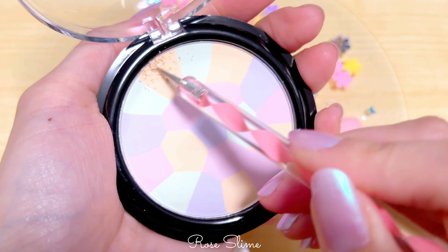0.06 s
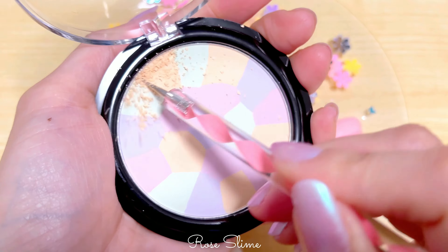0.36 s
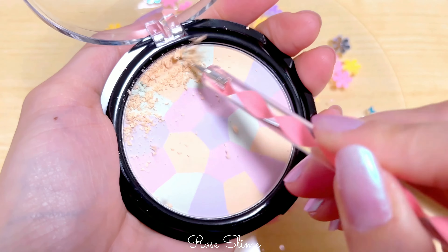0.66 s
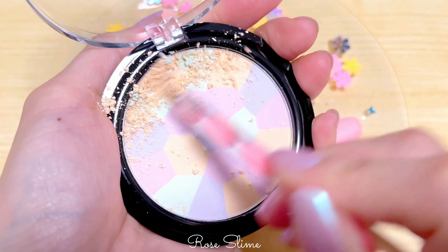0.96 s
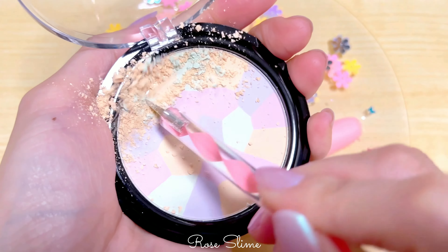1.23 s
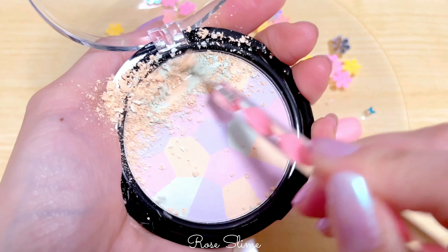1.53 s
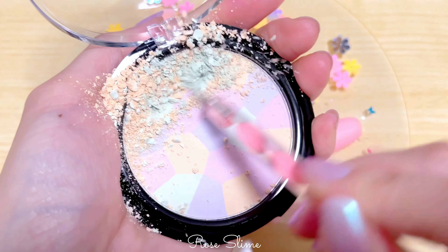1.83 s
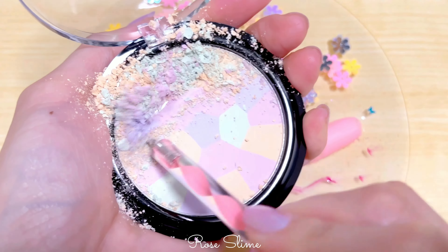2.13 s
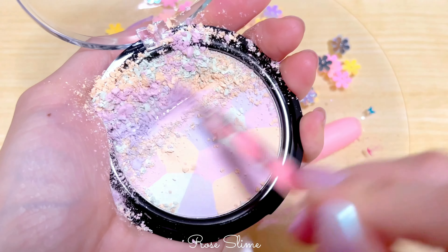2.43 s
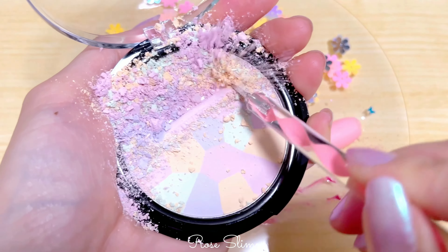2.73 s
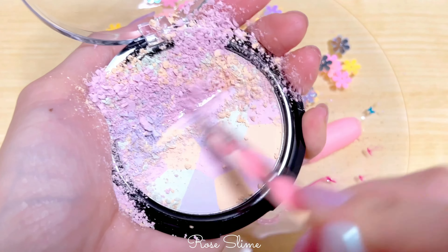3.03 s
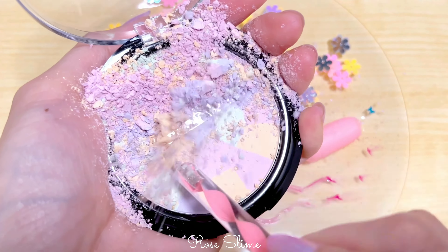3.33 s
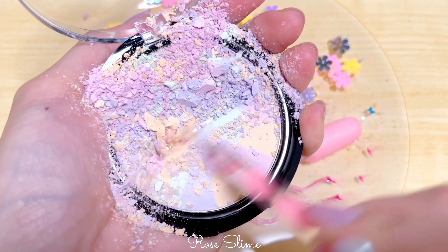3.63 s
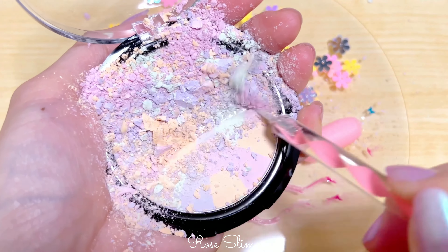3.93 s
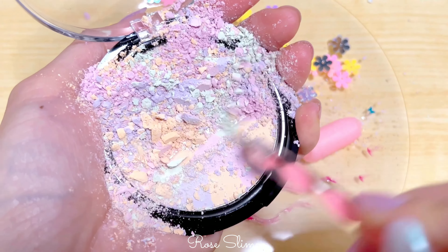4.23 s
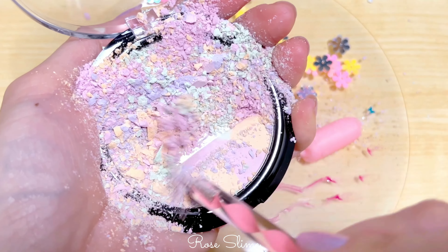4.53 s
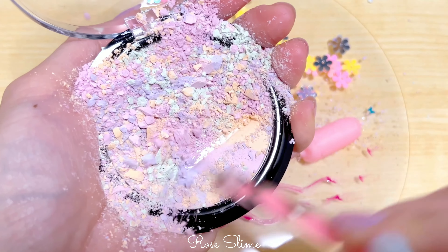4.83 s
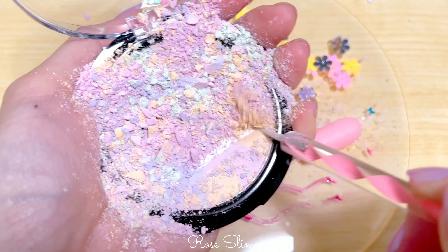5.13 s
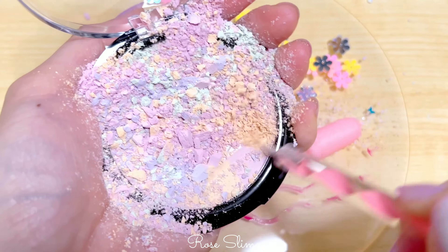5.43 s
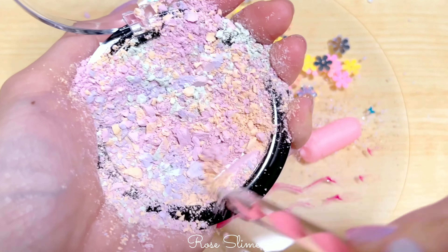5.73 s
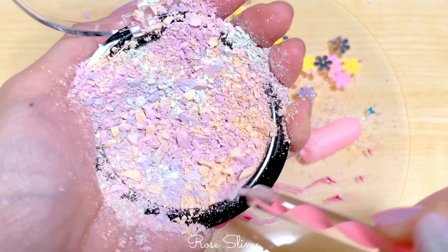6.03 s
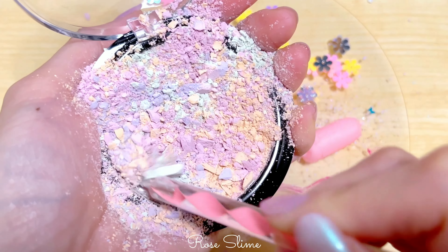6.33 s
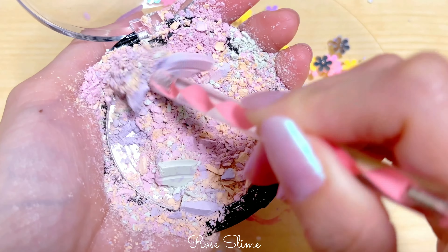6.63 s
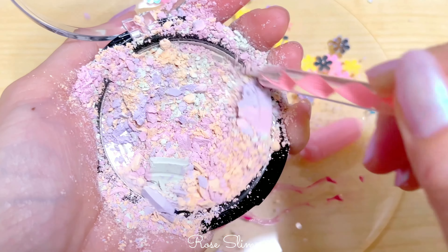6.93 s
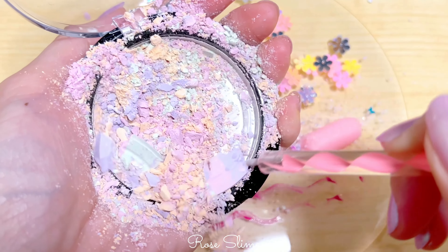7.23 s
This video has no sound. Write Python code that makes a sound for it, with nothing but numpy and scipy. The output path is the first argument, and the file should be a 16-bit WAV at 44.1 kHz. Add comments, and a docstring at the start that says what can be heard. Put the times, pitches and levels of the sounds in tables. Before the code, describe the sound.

Close to the microphone in a small quiet room, faint ticks grow into fast, even scratching as a metal point scrapes a compact of pressed powder. The scraping turns dense and crunchy, with gritty hiss, tiny cracks and a slight low shudder from the plastic case. After a short dip and one more burst, the tip slides around the rim with a softer, lightly ringing crumbly scrape that dies away.

```python
"""A small quiet room, microphone close to a hand-held plastic compact of pressed powder.
A pointed metal tool scratches the cake, about eight strokes a second: faint at first, then the tool rings.
From two seconds in it digs deeper, crunching, snapping flakes off and shaking the compact.
It eases just after five seconds and bites again briefly. From six seconds the tip sweeps once round
the rim through the loose crumbs, fading into the room's faint rumble and hiss."""
import sys
import numpy as np
from scipy import signal
from scipy.fft import rfft, irfft
from scipy.io import wavfile
from scipy.ndimage import uniform_filter1d

SR = 44100
rng = np.random.default_rng(int(sys.argv[2]) if len(sys.argv) > 2 else 0)


def unload_audio(sound):
    """Save the sound as a 16-bit wav file, at the path given as the first command line argument."""
    columns = np.transpose(np.atleast_2d(sound))
    # keep every value between -1 and 1, then stretch to whole-number steps
    steps = np.round(np.clip(columns, -1, 1) * 32767)
    wavfile.write(sys.argv[1], SR, steps.astype(np.int16))


N = 320204
TIME = np.arange(N) / SR

# Table levels are relative: each source adds its own trim.
# strokes of the tip: (start [s], length [s], level [dB], rocking of the compact [dB])
STROKES = [(0.23, 0.077, -83, -67), (.354, 0.068, -91, -70), (0.483, .042, -79, -62),
           (0.59, 0.058, -83, -57), (0.711, .048, -76.5, -64), (0.825, 0.022, -64.5, -70),
           (0.963, 0.0082, -39, -33), (1.033, 0.021, -42.5, -38.5), (1.183, 0.011, -48.5, -48),
           (1.25, 0.035, -37, -50), (1.369, 0.049, -39, -32), (1.476, 0.042, -37, -58),
           (1.594, 0.059, -37.5, -38), (1.708, 0.038, -30, -61), (1.819, .05, -32.5, -49.5),
           (1.94, 0.029, -34.5, -53), (2.06, 0.042, -31, -35), (2.167, 0.045, -34, -42),
           (2.296, 0.057, -35.5, -35), (2.395, .047, -34, -52.5), (2.52, 0.061, -37, -30),
           (2.634, 0.05, -33.5, -63.5), (2.756, 0.061, -37.5, -35.5), (2.875, 0.032, -32, -42.5),
           (2.998, 0.06, -38.5, -39.5), (3.11, 0.041, -34, -49.5), (3.25, 0.061, -34, -27.5),
           (3.36, 0.054, -35, -33.5), (3.474, 0.078, -33.5, -41.5), (3.604, 0.062, -32.5, -37),
           (3.726, 0.069, -34, -45.5), (3.851, 0.057, -34, -33), (3.974, .067, -34.5, -48.5),
           (4.095, 0.065, -38, -38), (4.218, 0.061, -36, -45), (4.326, 0.064, -34.5, -33.5),
           (4.454, 0.063, -34, -33.5), (4.569, .06, -34.5, -38.5), (4.702, 0.056, -35, -52.5),
           (4.821, .053, -33.5, -39), (4.944, 0.051, -34, -35), (5.059, 0.046, -33.5, -34.5),
           (5.172, 0.079, -38.5, -49), (5.299, 0.056, -35.5, -60), (5.418, 0.072, -40, -50),
           (5.571, 0.065, -36, -40.5), (5.65, 0.074, -39, -37.5), (5.78, 0.061, -33.5, -40.5),
           (5.899, 0.017, -47, -30)]
# how deep the tip digs into the cake: (time [s], bite [0-1])
BITE = [(.8, 0.58), (.96, 0.16), (1.18, 0.28), (1.25, 0.13), (1.37, 0.1), (1.6, 0.28), (1.7, 0.4),
        (1.94, 0.66), (2.06, .82), (2.8, .98), (3.5, 0.87), (4.2, 0.93), (4.33, 0.82), (5.06, 0.77),
        (5.17, .2), (5.3, 0.38), (5.42, 0.29), (5.58, 0.65), (5.9, 0.59)]
# the tool's ring changes with the grip: (time [s], ring [Hz], overtone [Hz], ring over stroke level [dB])
TOOL_RING = [(.82, 1700, 7800, 1), (.96, 2110, 7860, 10.5), (1.25, 1988, 8000, 17), (1.37, 1910, 8120, 2.5),
             (1.6, 1735, 8250, -1.5), (1.7, 1690, 8170, -11), (2.06, 1710, 8100, 4), (2.7, 1686, 7750, 2.5),
             (3.0, 1905, 7855, 9), (3.35, 1925, 7670, 9), (3.5, 1899, 7540, 7), (4.0, 1897, 7150, 6.5),
             (4.3, 2080, 7650, 9.5), (5.06, 2022, 7750, 11.5), (5.18, 2044, 7830, 2.5),
             (5.56, 1876, 7590, 4.5), (5.9, 1652, 7720, 0)]
# how strongly the plastic case answers: (time [s], level over the tool's ring [dB])
CASE_RESPONSE = [(.8, -5.5), (.96, -27.5), (1.25, -19), (1.37, -31), (1.94, -31), (2.06, -21.5), (2.35, -8),
                 (2.65, -13.5), (3.1, -18.5), (4.0, -14.5), (4.25, -32.5), (4.6, -38), (4.85, -27),
                 (5.42, -33.5), (5.64, -12)]
# the case's resonance sinks as the cake comes loose: (time [s], pitch [Hz])
CASE_PITCH = [(1.2, 1074), (3.2, 1096), (4.8, 1030), (5.6, 968.5)]
# large flakes breaking off: (time [s], knock [dB], snap [dB])
FLAKES = [(1.277, -10, -55), (2.0878, -12.5, -17), (2.2078, -14, -16), (2.331, -8, -21),
          (2.4046, -9, -19.5), (2.4335, -8.5, -21), (2.563, -7, -23.5), (2.6362, -20, -19.5),
          (2.8094, -6, -19.5), (3.0335, -8.5, -31), (3.1284, -11, -18.5), (3.1407, -0.5, -14),
          (3.2946, -9, -15.5), (3.3733, -5.5, -16.5), (3.3978, -3, -22), (3.497, -9.5, -17),
          (3.5198, 3, -25), (3.5235, -3, -14.5), (3.6072, -7.5, -19), (3.6252, -2.5, -19),
          (3.6459, -15, -34), (3.7284, -13, -22.5), (3.7424, -6.5, -24), (3.7725, 1.5, -10.5),
          (3.8685, -4.5, -31), (3.8887, -4, -31), (4.0001, -7.5, -16), (4.031, -1.5, -15.5),
          (4.0361, 3.5, -5), (4.1138, -8.5, -21.5), (4.1207, -5, -20), (4.2455, -6, -26), (4.2767, -9, -17),
          (4.3306, -3.5, -16.5), (4.5175, -7.5, -21), (4.5759, -1.5, -16.5), (4.7527, -.5, -15),
          (4.8275, 0.5, -14), (4.9137, -14.5, -38), (4.9916, -6, -41), (5.0655, -3, -31),
          (5.0907, -15.5, -17), (5.6051, -2.5, -7), (5.6492, -6, -22), (5.7801, -14.5, -31.5),
          (5.8258, -7, -13)]
# the tip circling the rim: (time [s], ring [dB], ring pitch [Hz], rim [dB], hiss [dB])
SWEEP = [(5.95, -61, 1670, -72, -66.5), (6.054, -70, 1750, -80, -52.5), (6.128, -44, 2150, -66, -46.5),
         (6.208, -53.5, 2110, -75.5, -67.5), (6.394, -32.5, 2250, -35, -46),
         (6.536, -36.5, 2030, -46.5, -41), (6.646, -60.5, 1810, -85, -66), (6.698, -44, 1875, -77, -57),
         (6.774, -57, 1700, -75, -51.5), (6.886, -44.5, 1620, -71, -47), (6.92, -58.5, 1610, -73, -52.5),
         (7.014, -38, 1564, -48, -47.5), (7.076, -62, 1540, -73.5, -66), (7.26, -74, 1670, -80, -61)]
# the rim's main resonance shifts as the tip travels round: (time [s], pitch [Hz])
RIM_PITCH = [(6.25, 2730), (6.4, 2800), (6.56, 2400), (6.92, 3160), (7.06, 3170)]
# judder while the tip cuts right through the cake: (time [s], level [dB])
JUDDER = [(3.11, -76), (3.25, -37), (3.97, -34), (4.15, -47), (4.85, -46.5), (5.06, -51), (5.2, -76),
          (5.5, -71), (5.65, -44), (5.9, -42)]
# resonances: (frequency [Hz], width [Hz], gain [dB])
THUD_AND_CASE_MODES = [(534, 780, -29.5), (1063, 100, 6), (1110, 76, -1.5)]   # a faint low thud, and the plastic case's tone near 1.1 kHz
CRUNCH_MODES = [(2900, 240, -4), (3055, 440, 2), (3783, 490, -6.5), (4930, 340, 1.5), (5725, 450, -1),
                (6275, 190, -1.5), (7480, 510, -14)]   # powder crushed in clumps
HISS_MODES = [(9470, 860, -14.5), (10240, 480, -3), (10630, 650, 2), (11840, 1300, 0.5),
              (13200, 420, -15.5), (14700, 510, -6)]       # fine grit under the tip
SNAP_MODES = [(2980, 920, 0), (4750, 410, -10), (6000, 564, -3)]       # a flake fracturing
RIM_MODES = [(1063, 70, 4), (3104, 160, -2), (4900, 210, -0.5), (5210, 170, -3)]         # the rim's steady tones
CRUMB_MODES = [(7290, 240, 4.5), (7700, 220, 1.5), (9100, 280, -12), (9930, 180, 1), (10480, 150, -4),
               (11180, 380, 2), (12380, 370, 4), (12860, 480, 2), (14600, 380, -6), (15400, 350, -15.5)]     # loose crumbs along the rim
PAN_MODES = [(1512, 170, 4), (1850, 24, -18.5), (1860, 36, -16)]         # metal pan ringing on
# echoes off the table and a bowl: (delay [s], level [dB])
ECHOES = [(.0072, -25.5), (.0094, -31.5)]
# room tone: (frequency [Hz], relative spectral density [dB])
ROOM_TONE = [(18, -21), (30, 3.5), (81, -7.5), (133, -14), (996, -27.5), (1330, -34), (2070, -33),
             (3490, -42.5), (10200, -43.5), (12300, -53.5), (15500, -37.5)]


def strokes(lead_s=.018, grab_s=.003, trail_s=.011):
    """Each stroke drives grit into tool and case; a deeper bite is lumpier and damps the tool's ring."""
    out = np.zeros(N)
    for start, length, level_db, _ in STROKES:
        end = start + length
        t = np.arange(start - lead_s, end + trail_s, 1 / SR)
        stages = [t[0], start - grab_s, start, start + length / 2, end, t[-1]]
        pressure = np.interp(t, stages, [0, .34, .55, 1.082, .55, 0]) ** 1.085
        ring_hz, overtone_hz, _ = at_time(TOOL_RING, start)
        _, ring_db, case_db, crunch_db = contact(start, level_db)
        depth = np.clip((crunch_db + 42.5) / 26, 0, 1)
        fine = rebound(grit(len(t), lump_db=5.5 + 3.6 * depth, lumps_per_s=1100))
        stick_slip = from_db(2.7 * depth * np.minimum(wander(len(t), 380), 1.6))
        coarse = fine * stick_slip
        ring = resonate(coarse, ring_hz, 320 + 480 * depth, order=3)
        ring += from_db(-14.5 + 3.3 * depth) * resonate(coarse, ring_hz * .84, 330)
        sag = at_time(CASE_PITCH, start)[0] / CASE_PITCH[0][1]
        sagged_modes = [(hz * sag, width, db) for hz, width, db in THUD_AND_CASE_MODES]
        thud_and_case = body(coarse, sagged_modes, detune=.015)
        # a light touch lets a middle mode sing
        squeak = from_db(11.5 - 60 * depth) * resonate(fine, overtone_hz * .74, 380)
        crunch = body(coarse, CRUNCH_MODES, vary_db=7.5, detune=.016) + squeak
        hiss = body(fine, [(overtone_hz, 700, 0)] + HISS_MODES, vary_db=2.5, detune=.026)
        dust = butter(coarse, [1600, 9000], "band")
        parts = [(ring, ring_db - 4.5), (thud_and_case, case_db + 4.6), (crunch, crunch_db - .67),
                 (hiss, level_db - 3.5), (dust, crunch_db - 17)]
        add(out, t[0], pressure * mix(parts, rms_one))
    return out


def contact(s, level_db, light_db=-30, deep_db=8.5):
    """What a stroke excites in tool, case and powder: the deeper the bite, the more crunch."""
    bite = np.clip(at_time(BITE, s)[0], 0, 1)
    ring_db = level_db + at_time(TOOL_RING, s)[2]
    case_db = ring_db + at_time(CASE_RESPONSE, s)[0]
    crunch_db = level_db + light_db + bite * (deep_db - light_db)
    return bite, ring_db, case_db, crunch_db


def grit(size, lump_db, lumps_per_s):
    """Countless grains giving way under the tip, in clumps."""
    return rng.standard_normal(size) * from_db(lump_db * np.minimum(wander(size, lumps_per_s), 2))


def rebound(x, share=.41, count=2):
    """Waves return from the pan's edges within milliseconds, differently for each point of contact."""
    delays = (rng.uniform(.0011, .005, count) * SR).astype(int)
    return x + share * sum(rng.choice([-1, 1]) * np.pad(x, (d, 0))[:len(x)] for d in delays)


def cracks(breaks, build_s=.0011, fracture_s=.00065, lead_s=.008, size=1024):
    """Each crack swells for a few milliseconds, then snaps and knocks near the tool's ring pitch."""
    out = np.zeros(N)
    t = np.arange(size) / SR - lead_s
    swell = np.exp(np.minimum(t / build_s, -t / fracture_s))
    for s, knock_db, snap_db in breaks:
        knock_hz = 1.071 * at_time(TOOL_RING, s)[0] * np.exp(.048 * rng.normal())
        case_db = knock_db + at_time(CASE_RESPONSE, s)[0]
        fracture = rng.standard_normal(size) * swell
        jolt = signal.unit_impulse(size, np.argmax(swell)) + .11 * fracture
        knock = resonate(jolt, knock_hz, 720, order=3)
        case = resonate(jolt, at_time(CASE_PITCH, s)[0], 230, order=3)
        # only violent breaks bring out the low thud and the top treble
        violence_db = np.interp(snap_db, [-22, -4], [-15, 0])
        thud = resonate(jolt, 540, 390)
        treble = from_db(violence_db - 6.5) * butter(fracture, [4000, 12500], "band", order=3)
        snap = body(fracture, SNAP_MODES, vary_db=4.5, detune=.055) + treble
        parts = [(knock, knock_db - 9.5), (case, case_db - 10), (snap, snap_db - 1.5),
                 (thud, (knock_db + case_db) / 2 - 25 + violence_db)]
        add(out, s - lead_s, mix(parts, burst_one))
    return out


def chips(per_s=45, spread_db=4.5, tries=5):
    """Small breaks, listed like FLAKES: one as the tip lands, more at random the deeper it digs."""
    breaks = []
    for start, length, level_db, _ in STROKES:
        bite, ring_db, _, crunch_db = contact(start, level_db)
        breaks.append((start, ring_db - .5 + 13 * bite, crunch_db - 3.5))
        draws = rng.random((tries, 2))
        scatter_db = spread_db * rng.standard_normal((tries, 2))
        for (place, chance), (knock_db, snap_db) in zip(draws, scatter_db):
            if chance < per_s * length * bite ** 2 / tries:
                breaks.append((start + place * length, ring_db + 10 + knock_db, crunch_db + 4 + snap_db))
    return breaks


def rim_sweep(trickle_db=-67):
    """The tip slides through loose crumbs along the rim; its resonances shift as the grip turns."""
    start = SWEEP[0][0]
    ring_db, ring_hz, rim_db, hiss_db = at_time(SWEEP, TIME[round(start * SR):])
    size = len(ring_hz)
    grains = grit(size, lump_db=3.5, lumps_per_s=550)
    damped = np.clip((ring_hz - 1650) / 450, 0, 1)   # the lower the tool rings, the purer
    ring = np.sqrt(1 - damped) * glide(grains, ring_hz, 132)
    ring += np.sqrt(damped) * glide(grains, ring_hz, 410)
    rim_hz = at_time(RIM_PITCH, TIME[-size:])[0]
    rim = glide(grains, rim_hz, 350) + from_db(-1.5) * rms_one(body(grains, RIM_MODES))
    hiss = np.zeros(size)
    for hz, width, db in CRUMB_MODES:
        flicker_db = 7 * np.minimum(wander(size, 13), 1)
        drift = np.exp(.016 * wander(size, 12))
        hiss += from_db(db + flicker_db) * glide(grains, hz * drift, width)
    trickle = butter(grit(size, lump_db=6, lumps_per_s=370), [250, 4200], "band", order=1)
    parts = [(ring, ring_db - .9), (rim, rim_db + .5), (hiss, hiss_db - .7), (trickle, trickle_db)]
    out = np.zeros(N)
    add(out, start, mix(parts, rms_one))
    return out


def pan_ring(scraping):
    """Scraping and breaking set the metal pan ringing."""
    return sum(from_db(db) * resonate(scraping, hz, width, order=1) for hz, width, db in PAN_MODES)


def settling_powder():
    """Powder thrown up by a stroke fizzes as it settles; a deeper bite throws more."""
    falling = np.zeros(N)
    for start, length, level_db, _ in STROKES:
        thrown = at_time(BITE, start)[0] ** 2 * from_db(level_db - 16)
        add(falling, start, thrown * push(length, attack_s=.03, decay_s=.012))
    fizz = butter(grit(N, lump_db=5.5, lumps_per_s=900), [3200, 12000], "band")
    return falling * rms_one(fizz)


def handling_noise(tremor_db=-68, judder_attack_s=.0055):
    """Each stroke rocks the hand-held compact at a low resonance; deep digging adds a judder above it."""
    def shaking(modes):
        rumble = body(rng.standard_normal(N), modes)
        return rumble / np.sqrt(uniform_filter1d(rumble ** 2, size=4096) + 1e-20)
    rocking, digging = np.full(N, from_db(tremor_db)), np.zeros(N)
    for start, length, _, rock_db in STROKES:
        add(rocking, start, from_db(rock_db - 4.06) * push(length, attack_s=.012, decay_s=.053))
        force = from_db(at_time(JUDDER, start)[0])
        add(digging, start - judder_attack_s, force * push(length, judder_attack_s, decay_s=.011))
    sway = rocking * shaking([(30, 27.2, -1), (63.46, 11, 7), (79, 29.7, -8)])
    judder = digging * shaking([(110, 37.4, 16.5), (180, 130, -4.5), (418, 130, -4.5)])
    return sway + butter(judder, 230, "low")


def small_room(x, t60_s=.13, wet_db=-14, wall_hz=7000):
    """Up close the direct sound leads; near surfaces echo at once and a short diffuse tail dies away."""
    t = TIME[:SR // 3]
    decay = from_db(-60 * t / t60_s) * np.clip(t / .0017, 0, 1)
    tail = butter(rng.standard_normal(len(t)), wall_hz, "low", order=1) * decay
    response = from_db(wet_db) * tail / np.sqrt(np.sum(tail ** 2))
    for delay, db in ECHOES:
        response[round(delay * SR)] += from_db(db)
    return x + signal.fftconvolve(x, response)[:N]


def room_tone(level_db=-63.5):
    """The quiet room's steady, faint rumble and hiss."""
    hz, db = np.transpose(ROOM_TONE)
    colour = from_db(np.interp(np.log(np.fft.rfftfreq(N, 1 / SR) + 1), np.log(hz), db))
    return from_db(level_db) * rms_one(irfft(rfft(rng.standard_normal(N)) * colour, N))


def resonate(x, hz, width, order=2):
    """A resonance with gain 1 on top; higher orders swell more slowly and have steeper sides."""
    edges = np.clip([hz - width / 2, hz + width / 2], 10, .45 * SR)
    return signal.lfilter(*signal.butter(order, edges, "band", fs=SR), x + 1e-18)


def body(x, modes, vary_db=0, detune=0):
    """Resonances in parallel; the point of contact shifts their strengths and pitches."""
    out = np.zeros(len(x))
    for k, (hz, width, db) in enumerate(modes):
        gain = (-1) ** k * from_db(db + vary_db * rng.normal())
        out += gain * resonate(x, hz * np.exp(detune * rng.normal()), width)
    return out


def glide(x, hz, width, block=256):
    """A resonance, applied twice, whose centre moves block by block; rms 1."""
    out, state = np.zeros(len(x)), np.zeros((2, 2))
    radius = np.exp(-np.pi * width / SR)
    for i in range(0, len(x), block):
        section = [1 - radius, 0, radius - 1, 1, -2 * radius * np.cos(2 * np.pi * hz[i] / SR), radius ** 2]
        out[i:i + block], state = signal.sosfilt([section, section], x[i:i + block], zi=state)
    return rms_one(out)


def push(length, attack_s, decay_s):
    """Rise, hold to the end of a stroke, die away."""
    t = TIME[:SR // 2]
    return np.minimum(t / attack_s, 1) * np.exp(-np.maximum(t - length, 0) / decay_s)


def wander(size, per_s):
    """Random values joined by straight lines, spread about 1."""
    return np.interp(np.arange(size) * per_s / SR, np.arange(size), rng.standard_normal(size))


def at_time(rows, s):
    """Each column of a curve at the given moment or moments."""
    times, *columns = np.transpose(rows)
    return [np.interp(s, times, column) for column in columns]


def butter(x, hz, kind, order=2):
    return signal.sosfilt(signal.butter(order, hz, kind, fs=SR, output="sos"), x)


def from_db(db):
    return 10 ** (np.asarray(db) / 20)


def rms_one(x):
    return x / np.sqrt(np.mean(x ** 2) + 1e-20)


def burst_one(x):
    """Scale the loudest 1.5 ms to rms 1."""
    return x / np.sqrt(uniform_filter1d(x ** 2, 66).max())


def mix(parts, normalise):
    """Normalise and sum (sound, level [dB]) pairs."""
    return sum(from_db(db) * normalise(sound) for sound, db in parts)


def add(out, s, sound):
    """Mix a sound in at a time."""
    at = max(round(s * SR), 0)
    out[at:at + len(sound)] += sound[:max(N - at, 0)]


def scene():
    """Tool and compact close to one microphone, over handling noise and room tone."""
    background = handling_noise() + room_tone()
    loose_crumbs = rim_sweep() + settling_powder()
    scraping = strokes() + cracks(FLAKES + chips())
    return (small_room(scraping + pan_ring(scraping) + loose_crumbs) + background)[None]


def record(dry, cutoff_hz=15800):
    """The microphone signal clips at full scale; a steep filter cuts the very top."""
    lowpass = signal.ellip(10, .1, 80, cutoff_hz, fs=SR, output="sos")
    return signal.sosfilt(lowpass, np.clip(dry, -1, 1))


dry = scene()
out = record(dry)
unload_audio(out)
```